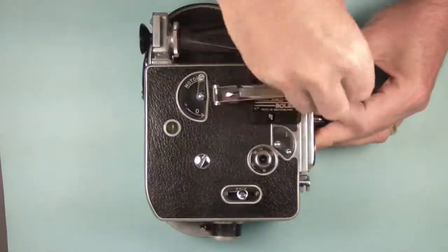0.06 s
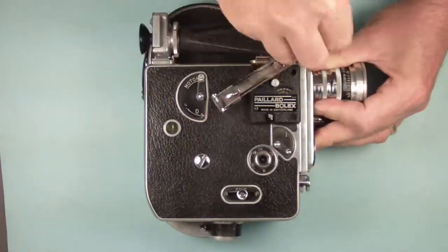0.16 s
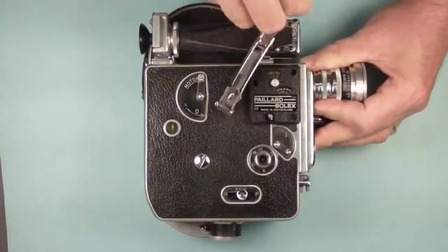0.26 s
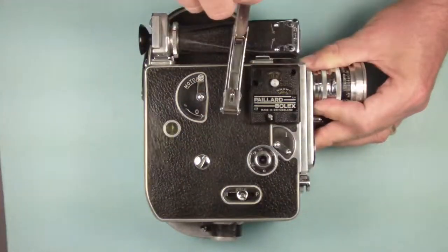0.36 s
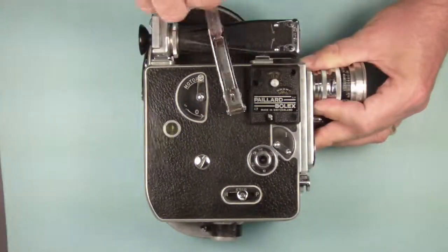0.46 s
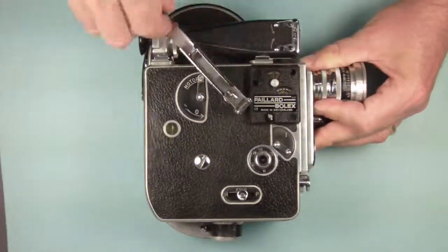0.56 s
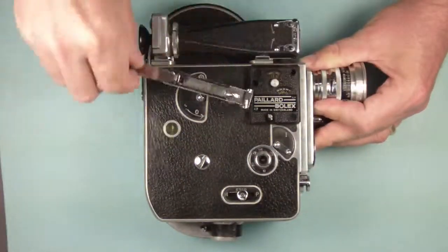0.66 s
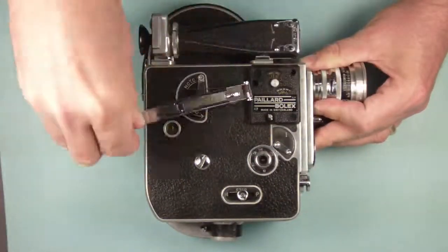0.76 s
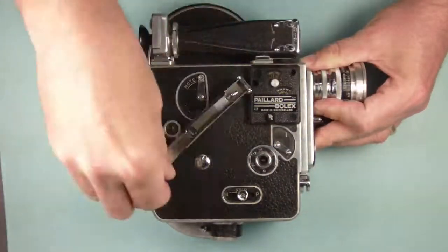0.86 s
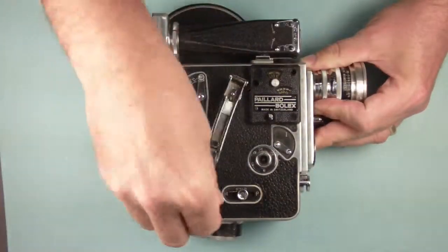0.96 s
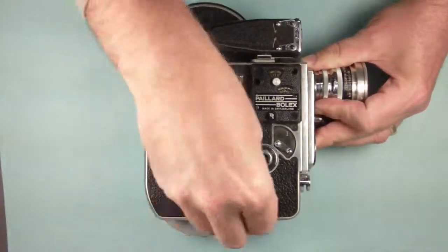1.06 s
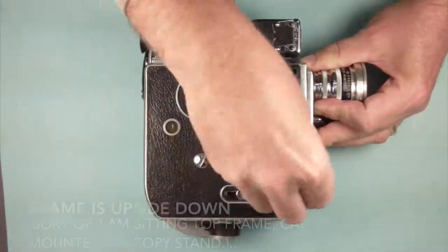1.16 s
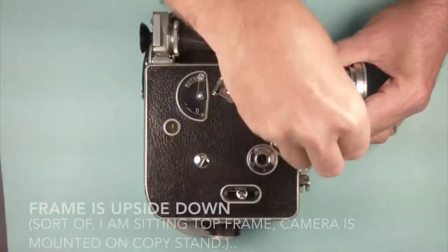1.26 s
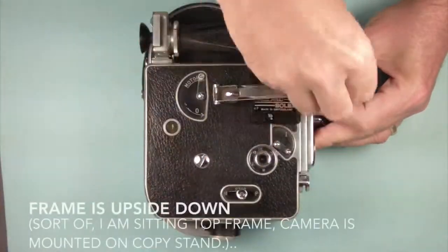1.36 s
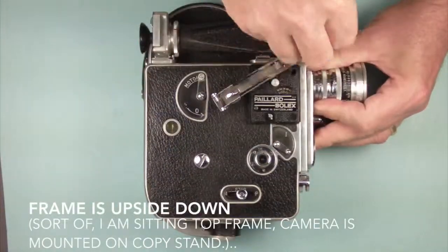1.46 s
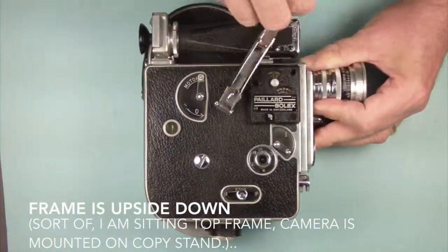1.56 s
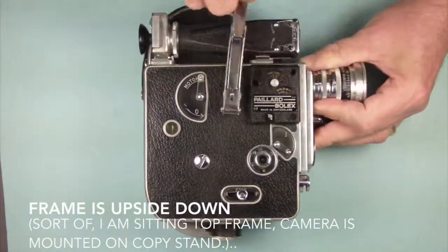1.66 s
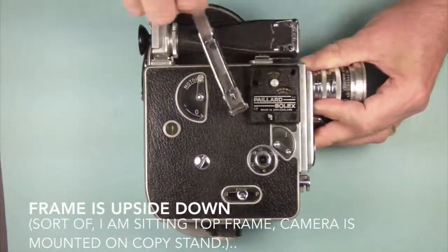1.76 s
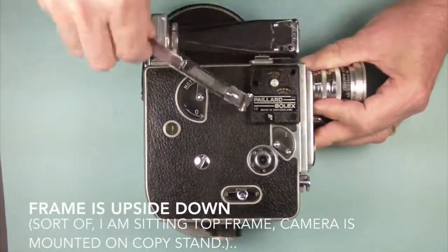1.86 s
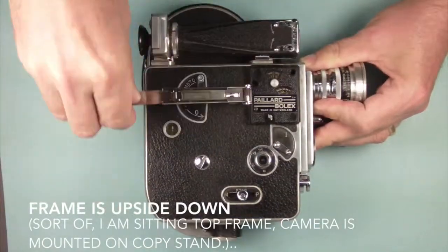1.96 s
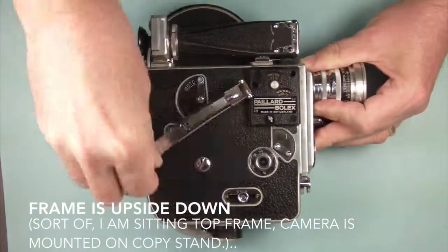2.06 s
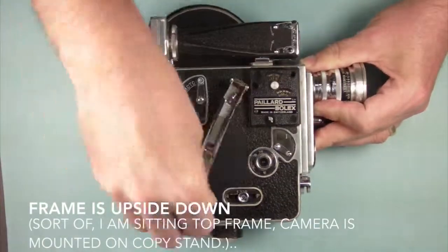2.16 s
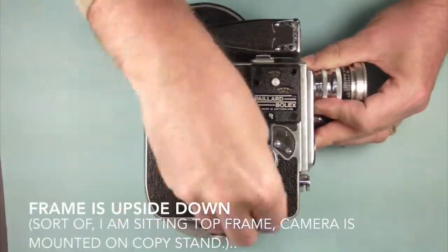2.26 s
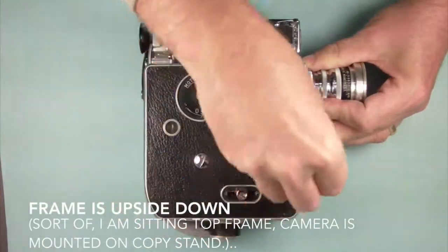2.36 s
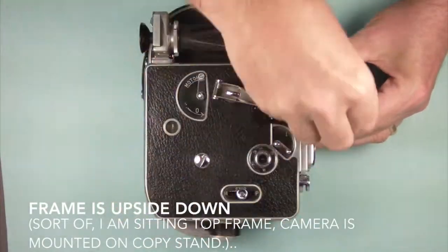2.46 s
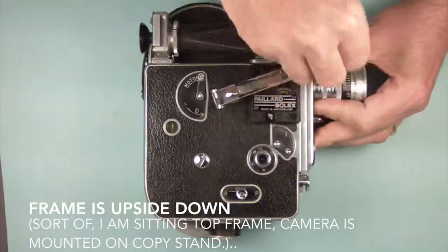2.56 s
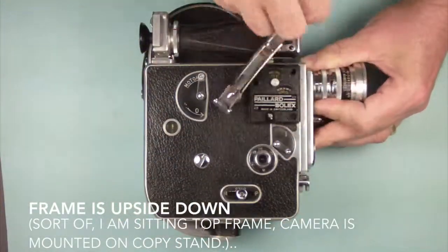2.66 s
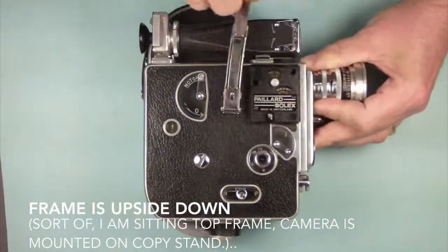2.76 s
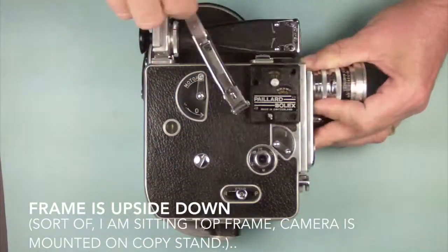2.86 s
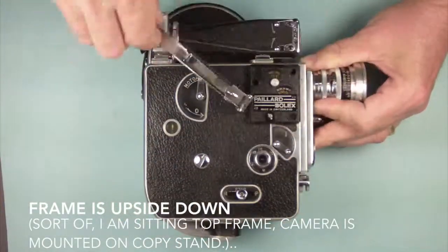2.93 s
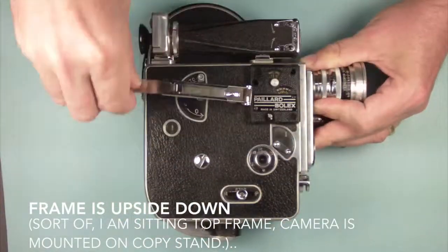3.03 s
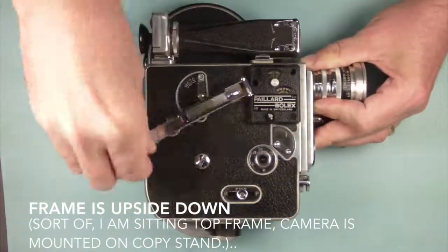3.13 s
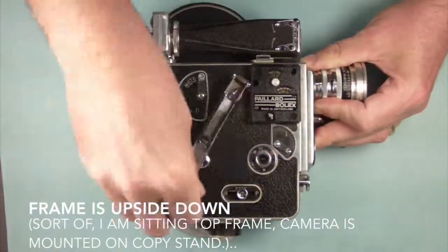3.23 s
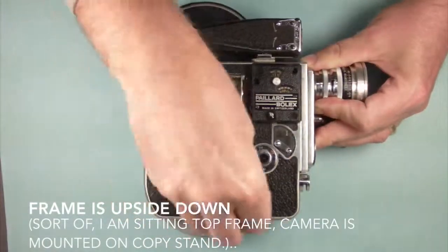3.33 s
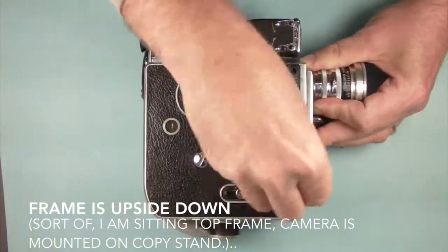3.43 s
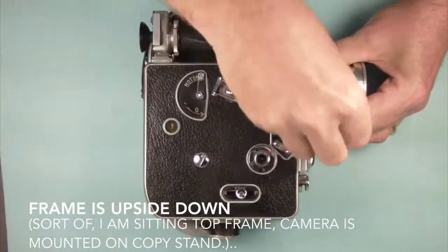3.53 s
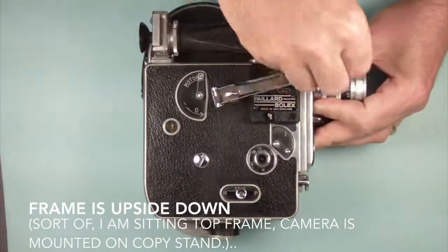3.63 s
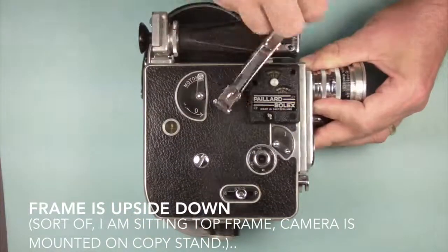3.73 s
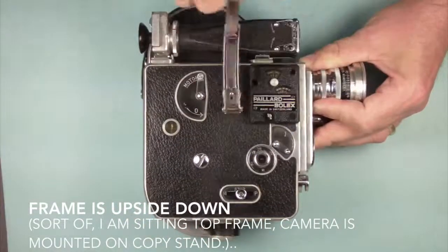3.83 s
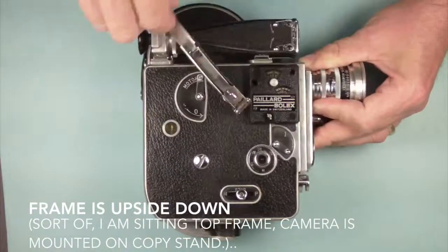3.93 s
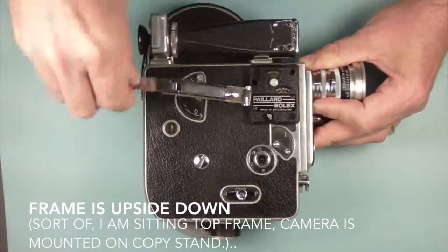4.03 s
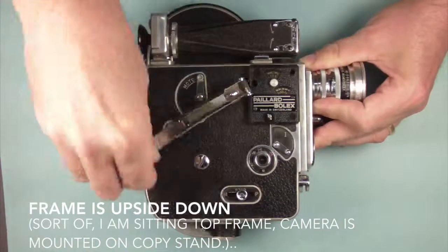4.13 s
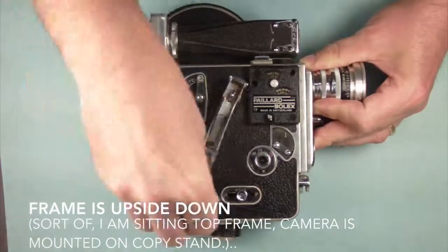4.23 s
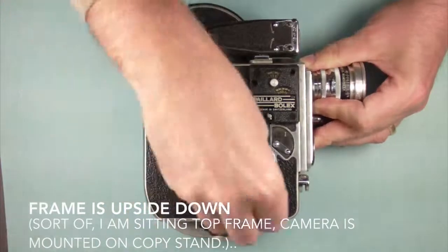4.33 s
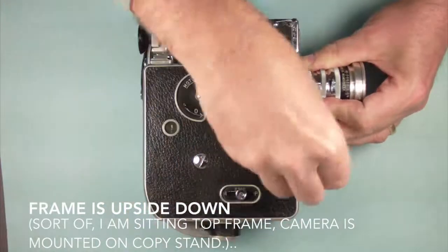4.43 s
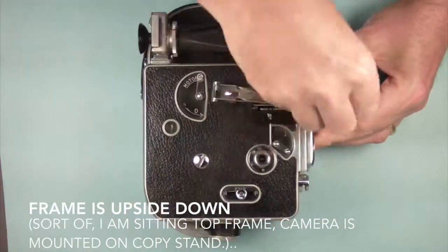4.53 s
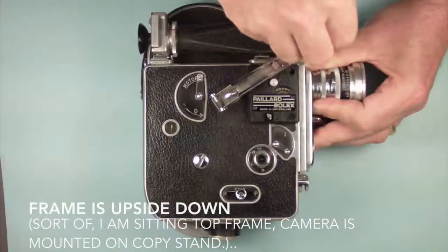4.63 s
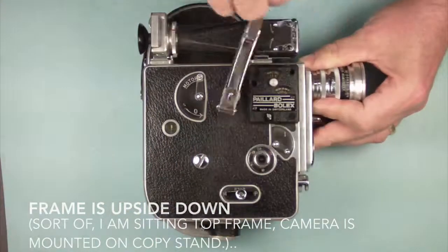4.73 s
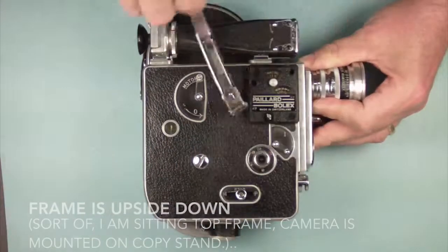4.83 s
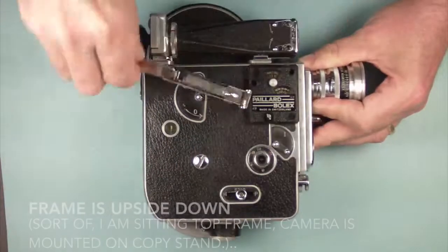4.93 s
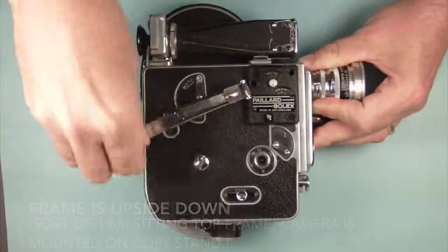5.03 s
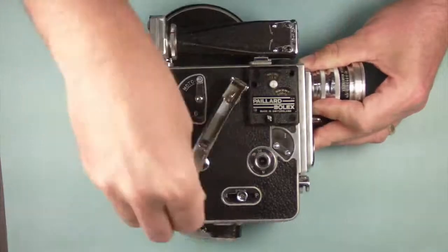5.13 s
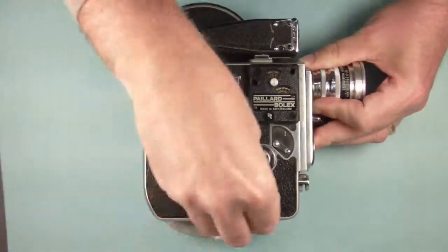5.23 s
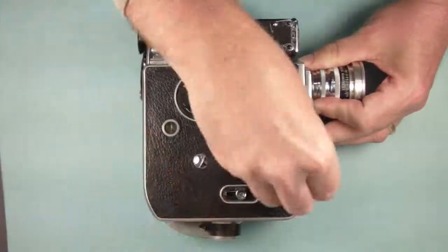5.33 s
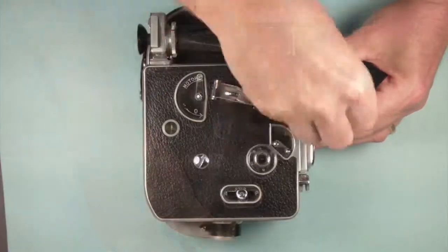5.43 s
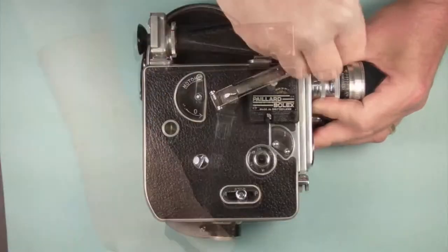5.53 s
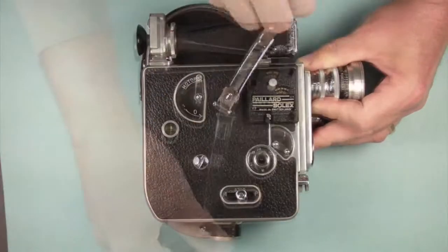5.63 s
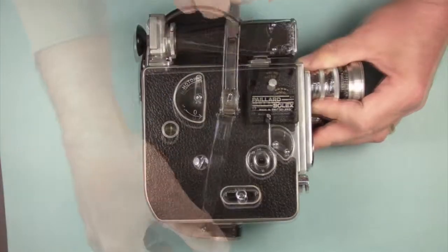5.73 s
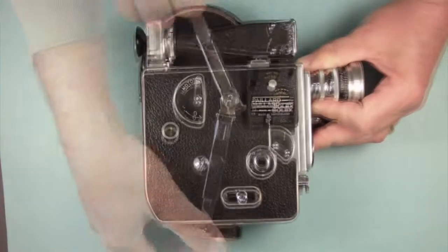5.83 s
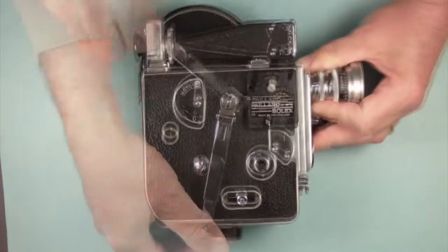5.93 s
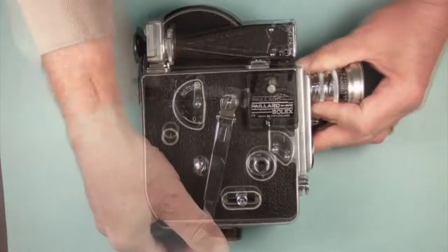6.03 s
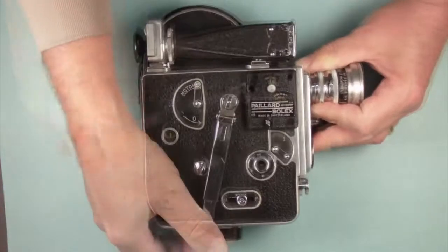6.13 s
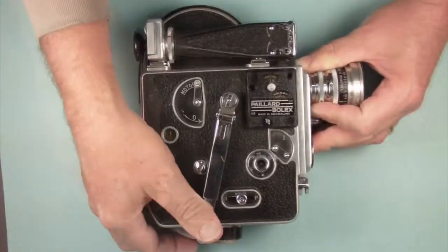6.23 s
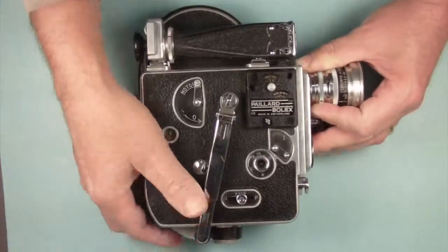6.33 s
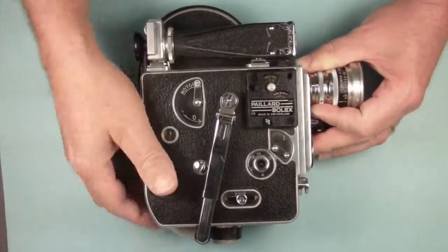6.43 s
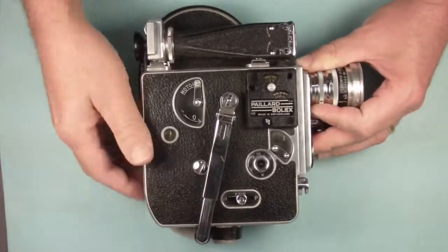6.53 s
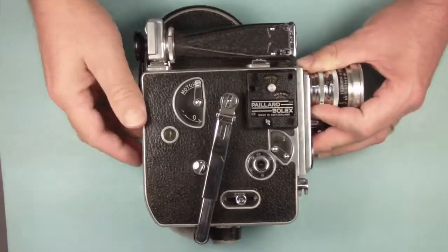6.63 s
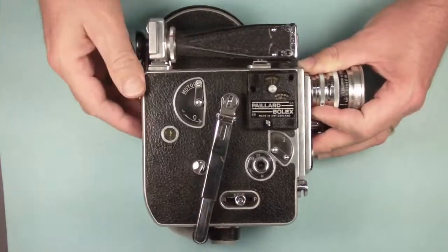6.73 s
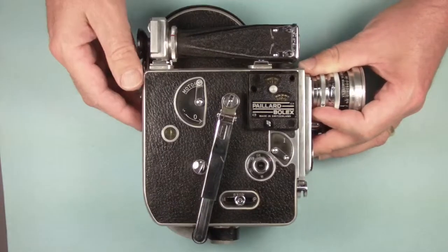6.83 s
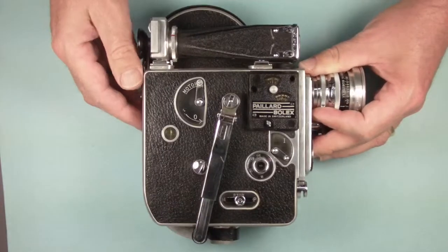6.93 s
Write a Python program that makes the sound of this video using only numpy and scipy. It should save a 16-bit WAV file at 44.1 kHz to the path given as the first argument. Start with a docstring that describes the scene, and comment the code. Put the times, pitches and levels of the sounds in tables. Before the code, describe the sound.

A rapid metallic ratchet is already running at the start, its tiny steel clicks merging into a buzzing whir that pulses roughly once per crank turn. The metal body gives a few muffled knocks and soft thuds against its support. The winding speeds up, then slackens and dies away, with one loud crisp snap near the end. The sound is close and centred, with a short small-room tail and faint low rumble.

```python
"""In a small room, a clockwork movie camera is wound with its hand crank, close to one microphone.
Three pawls drop in turn over each ratchet tooth: filtered noise buzzes and damped sines ring with crank angle.
The body knocks three times firmly and once faintly, and shifts softly: damped sines for shell and stand.
One sharp click, a burst of coloured noise, comes as the ratcheting fades away.
A faint reverberant tail, low rumble and hiss lie underneath."""
import sys
import numpy as np
from scipy import signal
from scipy.fft import rfft, irfft, next_fast_len
from scipy.io import wavfile

SR = 44100
rng = np.random.default_rng(int(sys.argv[2]) if len(sys.argv) > 2 else 0)


def generate_wav(sig):
    """Save sig (samples, or channels by samples) to the path in sys.argv[1] as 16-bit PCM at SR."""
    pcm = np.round(np.clip(np.atleast_2d(sig).T, -1, 1) * 32767).astype(np.int16)
    wavfile.write(sys.argv[1], SR, pcm)


N = 307930  # samples in the scene
CLICK_SIZE = 2048  # samples in one click
TEETH_PER_TURN = 30


def amp(db):
    """Decibels to an amplitude factor."""
    return 10 ** (np.asarray(db) / 20)


def unit(x):
    """A sound scaled to rms 1."""
    return x / np.sqrt(np.mean(x ** 2) + 1e-20)


def along(points, hz):
    """Read (frequency, value) points on a log frequency axis."""
    f, value = np.transpose(points)
    return np.interp(np.log(hz + 1), np.log(f + 1), value)


def filtered(x, response):
    """Shape the spectrum of x by a gain that depends on frequency."""
    size = next_fast_len(N + SR // 2)
    hz = np.fft.rfftfreq(size, 1 / SR)
    return irfft(rfft(x, size) * response(hz), size)[..., :N]


def add(track, s, sound):
    """Mix a sound into a track at time s."""
    part = track[max(round(s * SR), 0):][:len(sound)]
    part += sound[:len(part)]


def noise(spectrum):
    """Steady coloured noise of rms 1."""
    return unit(filtered(rng.standard_normal(N), lambda hz: amp(along(spectrum, hz))))


def sized(sound):
    """Scale each click to rms 1 over its first 5 ms."""
    head = sound[..., :SR // 200]
    return sound / np.sqrt(np.mean(head ** 2, axis=-1, keepdims=True))


def struck(force, gain):
    """Pass forces through a minimum-phase filter, so the response starts at the blow."""
    cepstrum = irfft(np.log(np.maximum(gain, 1e-6)))
    fold = np.r_[1, np.full(CLICK_SIZE // 2 - 1, 2), np.zeros(CLICK_SIZE // 2)]
    causal_response = np.exp(rfft(cepstrum * fold))
    return sized(irfft(rfft(force) * causal_response))


def ring(modes, attack):
    """Damped sines of one blow; a softer contact has a longer attack."""
    t = np.arange(SR // 3) / SR
    tone = np.zeros(len(t))
    for hz, db, t60 in modes:
        scatter_db = rng.normal(0, 1)
        tone += amp(db + scatter_db - 60 * t / t60) * np.sin(2 * np.pi * hz * t)
    return tone * (1 - np.exp(-t / attack))


# colour of the low rumble: (frequency [Hz], relative level [dB])
RUMBLE_COLOUR = [(20, -3), (40, -7), (55, 3), (80, -13), (119, -6), (146, -15), (180, -8), (230, -16),
                 (400, -19), (1000, -27), (3000, -50), (8000, -90)]
# colour of the hiss: (frequency [Hz], relative level [dB])
HISS_COLOUR = [(1000, 0), (3000, -1), (8000, -7), (14000, -12)]


def background(rumble_db=-61, hiss_db=-70):
    """Low room rumble under a faint hiss, both steady coloured noise."""
    return amp(rumble_db) * noise(RUMBLE_COLOUR) + amp(hiss_db) * noise(HISS_COLOUR)


# how long the room rings: (frequency [Hz], 60 dB decay time [s])
ROOM_DECAY = [(150, 0.32), (2000, .25), (6000, 0.073), (14000, 0.047)]


def room(x):
    """A tail of decaying noise, 4 ms behind the sound, whose treble dies first."""
    hz, t, bands = signal.stft(rng.standard_normal(SR // 2), SR, nperseg=256)
    decay = amp(-60 * t / along(ROOM_DECAY, hz)[:, None])
    tail = signal.istft(bands * decay, SR, nperseg=256)[1]
    delayed = np.pad(x, (SR // 250, 0))
    return signal.fftconvolve(delayed, tail / np.linalg.norm(tail))[:N]


# soft thuds of the body on the stand, some late after a knock or the click: (time [s], level [dB])
SOFT_SHIFTS = [(1.178, -39), (1.246, -48), (2.525, -45), (2.562, -48), (3.789, -46), (4.488, -44),
               (4.531, -47), (4.842, -45.5), (5.926, -43), (5.944, -48), (6.038, -47)]
# modes of the stand: (frequency [Hz], relative level [dB], 60 dB decay time [s])
STAND_MODES = [(108.5, 4, 0.088), (66, -5, 0.12), (160, -26.5, 0.035)]


def shifts():
    """Soft thuds of the body on the stand, some on their own and some coming late after a knock or the click;
    the stand rings dully under a soft contact."""
    track = np.zeros(N)
    for s, db in SOFT_SHIFTS:
        add(track, s, amp(db) * ring(STAND_MODES, attack=0.0064))
    return track


# dull knocks of the body: (time [s], shell level [dB], rocking level [dB])
BODY_KNOCKS = [(1.084, -45, -37.5), (1.289, -46, -62), (2.354, -30.5, -35.5), (5.319, -31.5, -37)]
# modes of the shell: (frequency [Hz], relative level [dB], 60 dB decay time [s])
SHELL_MODES = [(405, 1, 0.043), (174, -4, 0.079), (546, -23, 0.033), (270, -7, 0.078)]
# bounces after a knock: (delay [s], relative level [dB])
BOUNCES = [(.019, -1), (.041, 5), (0.059, -10), (.091, -4), (0.115, -6.5)]


def knocks():
    """The shell rings briefly, then the body bounces on the stand."""
    track = np.zeros(N)
    for s, shell_db, rocking_db in BODY_KNOCKS:
        add(track, s, amp(shell_db) * ring(SHELL_MODES, attack=0.001))
        for delay, db in BOUNCES:
            add(track, s + delay, amp(rocking_db + db) * ring(STAND_MODES, attack=0.0033))
    return track


# the sharp click: (time [s], snap level before an 8 dB cut [dB], shell level [dB], stand level [dB])
SHARP_CLICKS = [(5.9007, -9.5, -35.5, -40)]
# colour of the snap: (frequency [Hz], relative level [dB])
SNAP_COLOUR = [(200, -40), (700, -20), (1300, -21), (2000, -14.5), (2800, -11), (3600, -2.5), (5300, -1),
               (6200, -0.5), (8300, -4), (10200, 7), (12500, -10.5), (15500, -26)]
# shell modes the click jolts: (frequency [Hz], relative level [dB], 60 dB decay time [s])
JOLTED_MODES = [(170, -2.5, 0.079), (440, 0.5, .05), (505, -2, .035), (838, -4, .055), (1080, -7, 0.036),
                (1454, -23, .12)]


def catch(t60=0.024, lag=.002):
    """A steel catch snaps home, a burst of coloured noise, and jolts the shell and the stand."""
    track, t = np.zeros(N), np.arange(CLICK_SIZE) / SR
    colour = amp(along(SNAP_COLOUR, np.fft.rfftfreq(CLICK_SIZE, 1 / SR)))
    for s, snap_db, shell_db, stand_db in SHARP_CLICKS:
        burst = rng.standard_normal(CLICK_SIZE) * amp(-60 * t / t60)
        add(track, s, amp(snap_db - 8) * struck(burst, colour))
        shell = amp(shell_db) * ring(JOLTED_MODES, attack=0.00079)
        stand = amp(stand_db) * ring(STAND_MODES, attack=.003)
        add(track, s + lag, shell + stand)
    return track


# speed of the hand on the crank: (time [s], ratchet speed [teeth/s])
CRANK_SPEED = [(0.0, 24.65), (0.282, 23.99), (0.536, 16.42), (0.701, 28.68), (0.712, 24.32), (1.115, 22.76),
               (1.139, 19.18), (1.259, 27.31), (1.37, 23.12), (1.456, 25.17), (1.803, 20.77), (1.96, 31.88),
               (1.968, 28.18), (2.111, 24.05), (2.3, 28.66), (2.583, 28.95), (2.742, 26.14), (2.992, 30.14),
               (3.014, 26.01), (3.612, 27.57), (3.623, 30.99), (4.024, 32.56), (4.032, 36.08),
               (4.112, 32.43), (4.488, 26.61), (4.5, 32.09), (4.866, 33.77), (4.996, 38.35), (5.149, 30.56),
               (5.276, 31.64), (5.42, 26.53), (5.501, 33.54), (5.754, 28.28), (5.921, 18.7), (6.008, 23.14),
               (6.36, 21.24)]
# when each pawl drops, one entry per pawl: (lag [share of a tooth])
DROP_LAG = [0, .361, .713]
# level of the ratcheting, which fades away at the end: (time [s], level [dB])
RATCHET_LEVEL = [(0, -28.5), (.15, -28.5), (.323, -33), (.76, -35), (.789, -29), (1.271, -27), (1.8, -31),
                 (2.028, -34), (2.349, -31.5), (2.948, -37), (3.544, -34.5), (3.574, -27.5), (3.95, -30),
                 (4.177, -33), (4.645, -30.5), (4.716, -33.5), (4.969, -36), (5.55, -33), (5.77, -37),
                 (6.141, -49), (6.36, -65.5)]
# how hard each pawl drops round one turn of the crank:
# (angle [turns], first pawl [dB], second pawl [dB], third pawl [dB])
DROP_FORCE = [(0.0, -1.5, -4.5, -5), (0.1, -0.14, -4, -5.1), (0.25, 3, -4.5, 0.2), (0.43, 4.5, -2.2, 0),
              (0.48, 1.8, -3, -5.5), (0.62, 1.75, -5, -3), (0.75, 0.54, -5.5, -4), (0.87, -4, -6.5, -4),
              (0.94, -1.5, -4, -4)]


def drops(index, first_tooth=.283, scatter_db=.5):
    """Time, crank angle and level of every drop of one pawl, as the crank carries the teeth past it."""
    s, speed = np.transpose(CRANK_SPEED)
    t = np.arange(0, s[-1], 1 / SR)
    # first_tooth: teeth of travel before the first pawl's first drop
    travel = np.cumsum(np.interp(t, s, speed)) / SR - first_tooth
    tooth = np.arange(int(travel[-1] - DROP_LAG[index]) + 1)
    times = np.interp(tooth + DROP_LAG[index], travel, t)
    angle = tooth / TEETH_PER_TURN
    turns, *force_db = np.transpose(DROP_FORCE)
    level = np.interp(times, *np.transpose(RATCHET_LEVEL))
    level = level + np.interp(angle, turns, force_db[index], period=1)
    return times, angle[:, None], level + scatter_db * rng.standard_normal(len(tooth))


def swell(turns):
    """A hump from 0 to 1 that comes round at every whole turn."""
    return np.cos(np.pi * turns) ** 4


# clear steel modes of the pawls: (pawl [1-3], frequency [Hz], relative level [dB],
# 60 dB decay time [s], swell with crank angle [dB], loudest angle [turns])
STEEL_MODES = [(1, 2040, -9, 0.029, 9.5, 0.34), (1, 3520, 2, 0.027, 4, 0.7),
               (1, 4860, -1.5, 0.025, 6, 0.84), (1, 8290, -7, 0.018, 8, .3),
               (1, 9590, -4, 0.023, 9.5, 0.23), (2, 1900, -10, 0.027, 9.5, 0.3),
               (2, 3585, 1, 0.027, 2.5, 0.129), (2, 4770, -4.5, 0.024, 8.5, .02),
               (2, 10830, -4.5, .024, 7, 0.37), (3, 2020, -6, 0.028, 10.5, .31),
               (3, 4800, -7.5, .026, 13.5, 0.99)]


def steel(angle, index, attack=0.001, scatter_db=1.5, wander_hz=30):
    """The clear ring of one pawl at every tooth; the shifting contact point detunes each mode."""
    t, tone = np.arange(CLICK_SIZE) / SR, 0
    for owner, hz, db, t60, swell_db, best in STEEL_MODES:
        if owner == index + 1:
            size, tuning, phase = rng.standard_normal((3, len(angle), 1))
            level = db + swell_db * swell(angle - best) + scatter_db * size
            wave = np.sin(2 * np.pi * (hz + wander_hz * tuning) * t + phase)
            tone = tone + amp(level - 60 * t / t60) * wave
    return tone * (1 - np.exp(-t / attack))


def chatter(count, hold, t60, memory, fresh, strike_db=0, strike_s=0.00066):
    """A pawl strikes and buzzes for a few ms, much as on the tooth before and on the turn before."""
    t = np.arange(CLICK_SIZE) / SR
    # each tooth of the wheel has its own noise, which returns every turn
    tooth_noise = rng.standard_normal((TEETH_PER_TURN, CLICK_SIZE))
    new = tooth_noise[np.arange(count) % TEETH_PER_TURN]
    # memory carries part of each buzz over to the next tooth
    start = memory * rng.standard_normal((1, CLICK_SIZE))
    habit = signal.lfilter([np.sqrt(1 - memory ** 2)], [1, -memory], new, axis=0, zi=start)[0]
    chance = rng.standard_normal((count, CLICK_SIZE))
    buzz = np.sqrt(1 - fresh) * habit + np.sqrt(fresh) * chance
    buzz_decay = amp(-60 * np.maximum(t - hold, 0) / t60)
    strike = amp(strike_db) * np.exp(-t / strike_s)
    return buzz * (buzz_decay + strike)


def resonance(hz, centre_hz, width_hz):
    """Power response of a resonance with steep skirts; the width is taken 6 dB down."""
    return 1 / (1 + (2 * (hz - centre_hz) / width_hz) ** 2) ** 2


# low resonances of the case, shared by all pawls: (frequency [Hz], width [Hz], relative level [dB])
CASE_RESONANCES = [(110, 64, -13), (180, 67, -12.5), (405, 360, -23.5), (602, 88, -15.5), (836, 43, -19),
                   (1110, 215, -17.5), (1424, 152, -34)]


def pawl(modes, index, gain_db, ring_db, hold, t60):
    """One pawl drops once a tooth; the crank angle sets how well it drives each resonance."""
    times, angle, levels = drops(index)
    hz = np.fft.rfftfreq(CLICK_SIZE, 1 / SR)
    power = sum(amp(db) ** 2 * resonance(hz, centre, width) for centre, width, db in CASE_RESONANCES)
    for centre, width, db, swell_db, swells, best in modes:
        drive = amp(db + swell_db * swell(swells * (angle - best)))
        power = power + drive ** 2 * resonance(hz, centre, width)
    buzz = chatter(len(times), hold, t60, memory=0.89, fresh=.22)
    rattle = struck(buzz, np.sqrt(power))
    clicks = sized(rattle + amp(ring_db) * steel(angle, index))
    track = np.zeros(N)
    for s, db, click in zip(times, levels, clicks):
        add(track, s, amp(db + gain_db) * click)
    return track


# broad resonances of each pawl's rattle: (frequency [Hz], width [Hz], relative level [dB],
# swell with crank angle [dB], swells [per turn], loudest angle [turns])
FIRST_RATTLE = [(2710, 930, -10.5, 5, 1.0, 0.82), (4160, 470.0, -4.5, 4.5, 1.0, 0.71),
                (5125, 1170.0, -1.5, 3, 1.0, 0.27), (5660, 1500, -9, 11, 2.0, 0.28),
                (6870, 590, -6, 3, 1.0, 0.91), (8280, 1970, -4, 8, 1.0, 0.28),
                (10660, 2800, -8.5, 1.5, 1.0, 0.044), (12370.0, 830.0, -16.5, 9.5, 1.0, 0.16),
                (13980.0, 3000.0, -22, 6.5, 1.0, 0.66)]
SECOND_RATTLE = [(2690, 1160, -9, 1, 1.0, 0.4), (4350, 1070, -7.5, 7.1, 2.0, 0.97),
                 (5410.0, 746, -10, 4.4, 2.0, 0.37), (6530.0, 2200, -12.5, 5.5, 1.0, 0.99),
                 (7800, 1350.0, -13.5, 11, 1.0, 0.48), (9550, 2000, -10, 4.9, 2.0, 0.28),
                 (11810.0, 2300, -14, 6.4, 1.0, 0.39), (15300, 360, -23.5, 8.0, 1.0, 0.59)]
THIRD_RATTLE = [(2610, 1200, -9.5, 7, 2.0, 0.033), (3400, 450.0, -13, 8.0, 1.0, 0.22),
                (4060, 2000, -10, 11, 1.0, 0.65), (5180, 1300, -13, 18, 1.0, 0.33),
                (5870, 2200, -5, 3.8, 1.0, 0.94), (7000, 450.0, -12.5, 18, 1.0, 0.787),
                (8000, 1800, -4.5, 4.0, 1.0, 0.7), (9900, 1300, -7.5, 12, 2.0, 0.088),
                (10950, 840, -17, 17.6, 1.0, 0.08), (11900, 3800, -15.5, 8.4, 1.0, 0.67),
                (15000, 1900, -29, 12, 1.0, 0.68)]


def ratchet():
    """The three pawls together make the whir; each buzz holds, then decays by 60 dB in t60 (s)."""
    first = pawl(FIRST_RATTLE, index=0, gain_db=0.29, ring_db=-0.5, hold=0.0043, t60=0.017)
    second = pawl(SECOND_RATTLE, index=1, gain_db=-0.3, ring_db=1.5, hold=0.0047, t60=0.021)
    third = pawl(THIRD_RATTLE, index=2, gain_db=0.55, ring_db=1.5, hold=0.0038, t60=0.018)
    return first + second + third


def scene():
    """The camera, its room tail and the background; one microphone feeds both channels."""
    camera = ratchet() + knocks() + shifts() + catch()
    mono = camera + amp(-16.5) * room(camera) + background()
    return np.array([mono, mono])


def record(dry, top_hz=15450):
    """The recorder cuts very steeply above its band limit."""
    return filtered(dry, lambda hz: 1 / np.sqrt(1 + (hz / top_hz) ** 120))


dry = scene()
out = record(dry)
generate_wav(out)
```